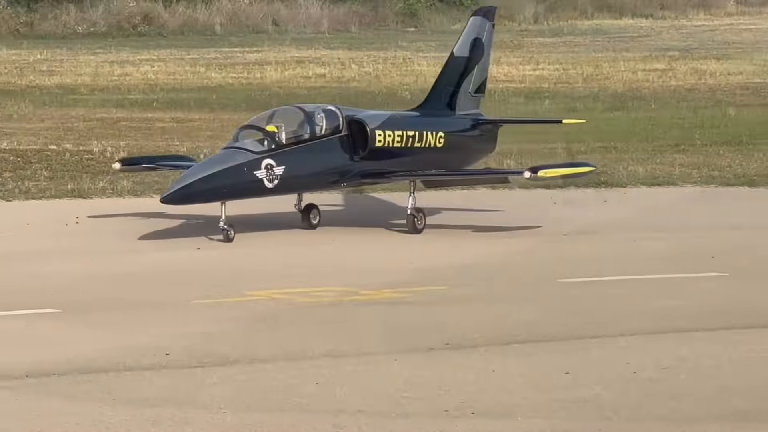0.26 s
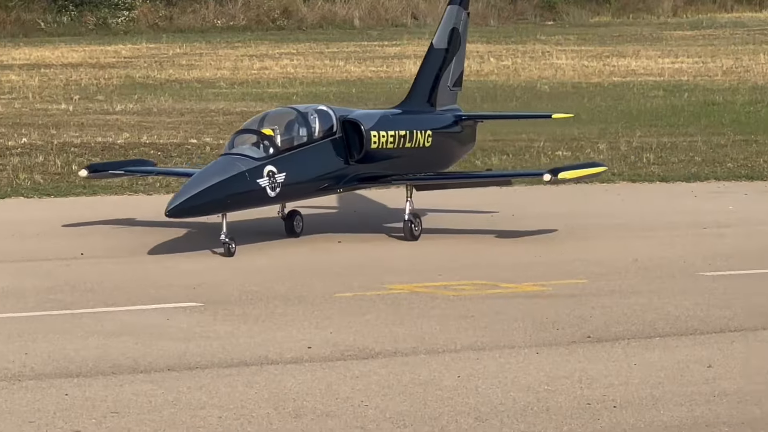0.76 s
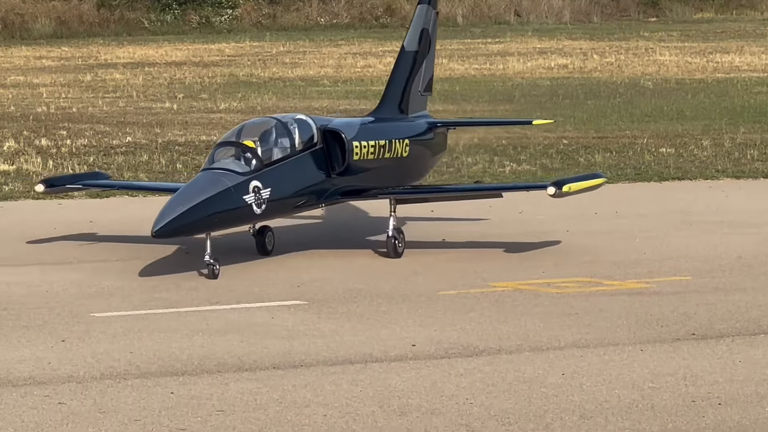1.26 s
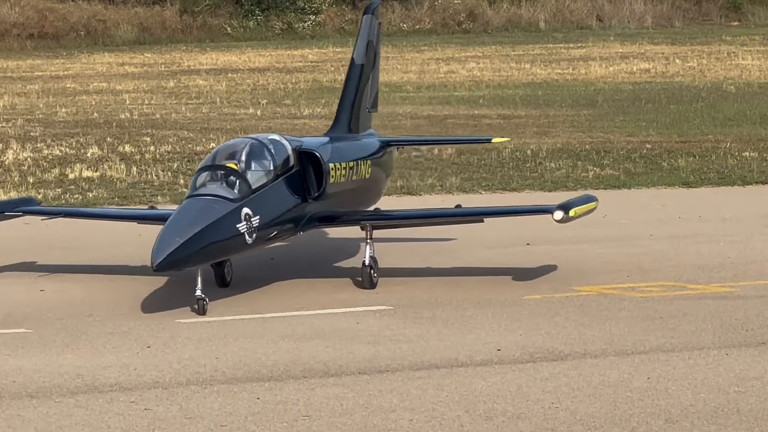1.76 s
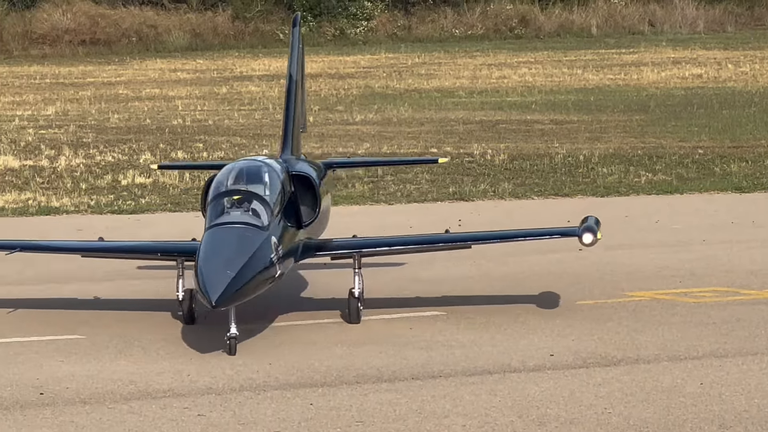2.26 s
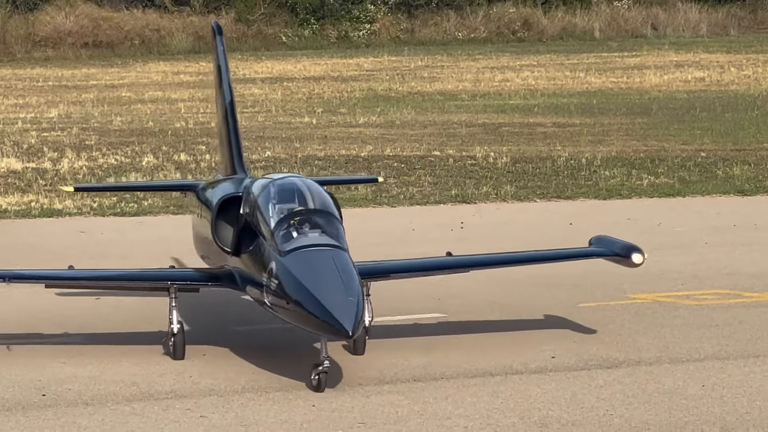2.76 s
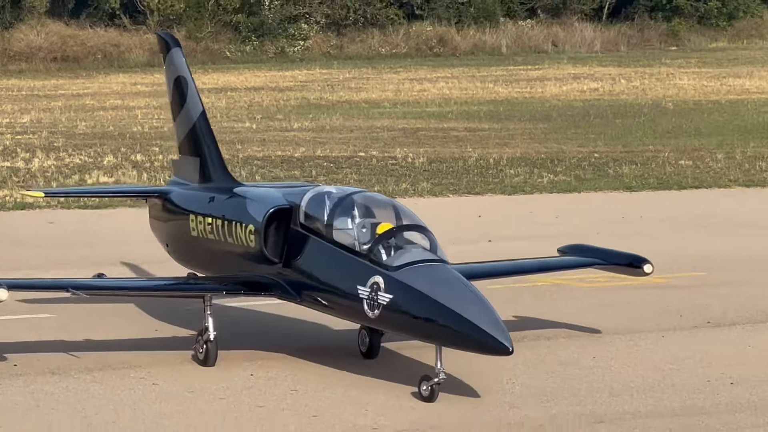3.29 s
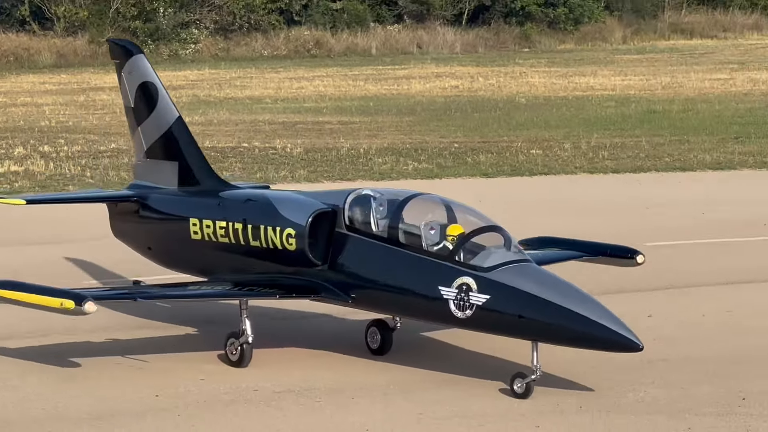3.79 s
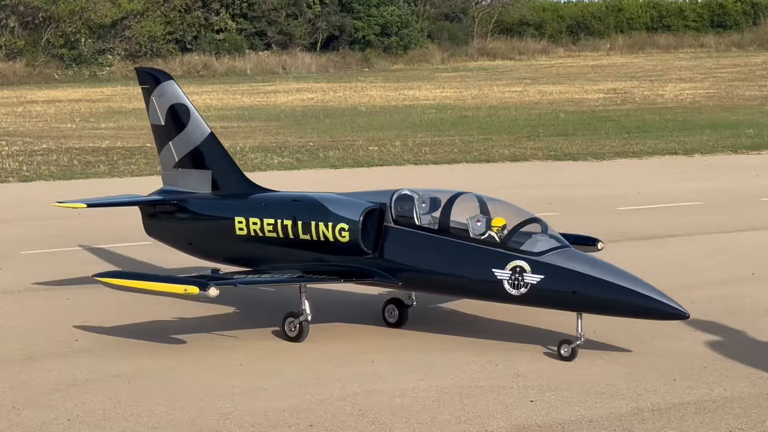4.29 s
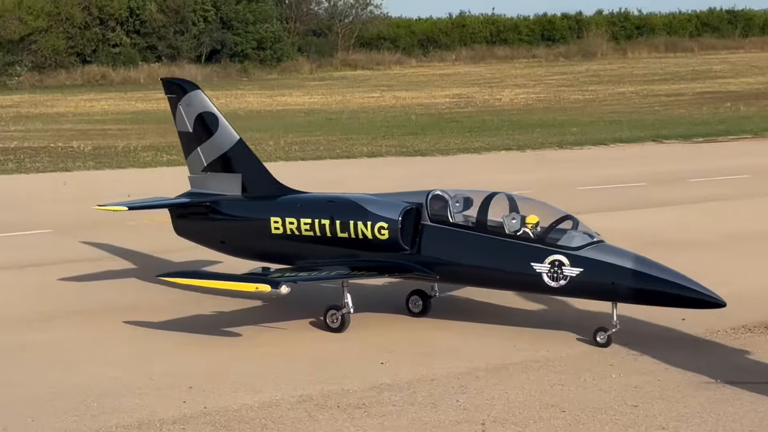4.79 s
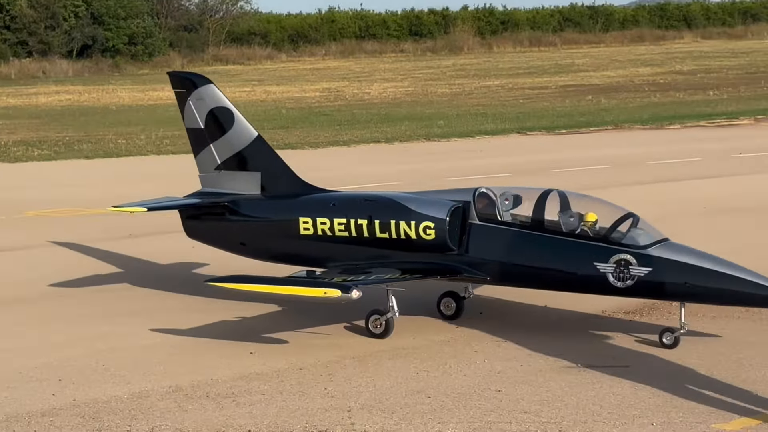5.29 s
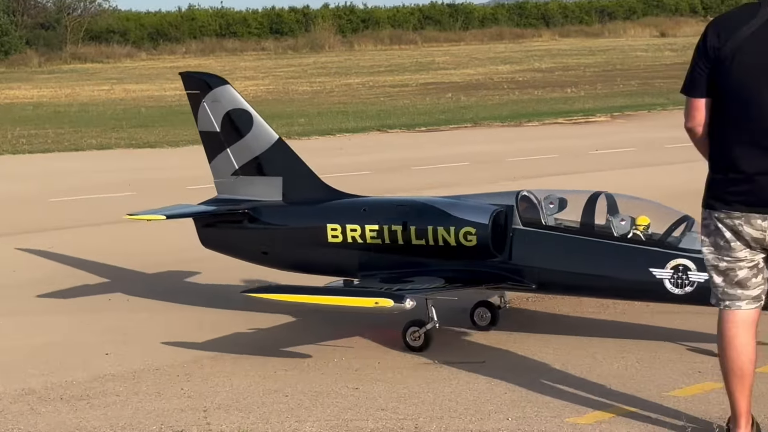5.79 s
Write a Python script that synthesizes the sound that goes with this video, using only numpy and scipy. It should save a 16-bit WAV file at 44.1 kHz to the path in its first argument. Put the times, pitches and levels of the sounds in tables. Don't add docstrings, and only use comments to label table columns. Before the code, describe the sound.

A miniature jet engine slows continuously, its glassy whine falling a few semitones over six seconds. Air hiss opens brightly as the intakes face the close handheld stereo phone, then thins as the aircraft turns broadside, leaving more rough exhaust rush and a thinner whine. Low wind rumble and soft buffets hit the microphone early on. Open, dry runway.

```python
import sys
import numpy as np
from scipy import signal
from scipy.fft import rfft, irfft, next_fast_len
from scipy.io import wavfile
from scipy.ndimage import uniform_filter1d

SR = 44100
rng = np.random.default_rng(int(sys.argv[2]) if len(sys.argv) > 2 else 0)


def gain_from_db(level_db):
    decades = np.asarray(level_db, float) / 20
    return 10 ** decades


def put_to_file(sound):
    columns = np.atleast_2d(sound).T
    safe = np.clip(columns, -1, 1)
    whole_steps = np.round(safe * 32767)
    wavfile.write(sys.argv[1], SR, whole_steps.astype(np.int16))


N = 266805
SIZE = next_fast_len(N, real=True)
TIME = np.arange(N) / SR
FREQ = np.fft.rfftfreq(SIZE, 1 / SR)

# time in seconds, level in dB.
GUST_LEVEL = [(0.0, -38.5), (0.71, -32.5), (1.2, -36), (1.38, -34.5), (1.68, -40), (1.85, -34.5),
              (2.66, -41.5), (2.7, -46.5), (3.42, -46), (3.85, -41), (3.94, -49), (4.55, -47.5),
              (4.97, -44), (5.29, -47.5), (5.4, -44), (5.69, -39), (5.91, -48), (6.05, -35.5)]
# frequency in Hz, density in dB per Hz.
GUST_COLOUR = [(15, -38), (30, -18.5), (55, 2.5), (90, 0), (150, -3), (250, -14), (400, -14.5), (700, -47)]
# time in seconds, peak in dB, centre frequency in Hz.
THUMPS = [(0.078, -22.5, 503), (0.187, -28, 745), (0.299, -28, 620), (0.323, -26, 594), (0.475, -26.5, 586),
          (0.683, -25.5, 417), (0.694, -19.5, 637), (0.78, -28, 376), (0.838, -29.5, 607),
          (0.911, -22.5, 450), (0.959, -27, 363), (1.234, -26, 483), (1.264, -24.5, 545), (1.284, -24, 487),
          (1.381, -21, 329), (1.489, -29, 600), (1.535, -27, 370), (1.585, -24.5, 520), (1.618, -24, 475),
          (1.674, -28, 467), (1.794, -29.5, 675), (2.031, -28.5, 450), (2.11, -29.5, 530),
          (2.217, -27, 435), (2.273, -25, 617), (2.628, -31.5, 513), (2.94, -34, 637), (3.27, -31.5, 392),
          (3.394, -32.5, 610), (3.518, -34, 543)]
SMALL_EDDIES, MIDDLING_EDDIES, GUSTY_S = 170, 60, 3.9

# time in seconds, wing lag in ms, wing share, runway lag in ms, runway share.
ECHOES = [(0, 1.3, -0.0083, 3.26, 0.35), (1, 2.3, 0.063, 3.38, 0.12), (1.8, 2.05, -0.25, 3.76, 0.51),
          (2.7, 2.4, -0.17, 4.5, 0.27), (3.4, 2.3, -0.04, 4.1, 0.12), (5, 1.33, -0.034, 3.93, 0.15),
          (6.05, 0.95, 0.039, 3.85, 0.5)]
# frequency in Hz, density in dB per Hz.
HUM_COLOUR = [(130, -20.5), (190, -9.5), (245, -5), (300, -12), (400, -13.5)]
# frequency in Hz, density in dB per Hz.
RUSH_LOW_COLOUR = [(250, -19), (400, 0), (600, -0.5), (750, 2.5), (950, -4), (1200, -41)]
RUSH_HIGH_COLOUR = [(900, 3.5), (1150, -3.5), (1420, 0), (1700, -3), (2000, -2), (2300, -1.5), (2600, -1)]
# time in seconds, level in dB.
JET_SURGE = [(0, -4), (0.4, 0.5), (1.0, 0), (1.3, 1), (1.6, 0), (1.9, -2.5), (2.3, -0.5), (2.7, -0.5),
             (3.15, 1), (3.45, -1), (3.9, -1), (4.6, 0.5), (5.3, 0), (5.65, 3), (6.05, 2)]

# frequency in Hz, density in dB per Hz.
DUCT_LOW_COLOUR = [(2000, -28), (2600, -4.5), (3150, 1), (3600, -19), (4200, -23)]
DUCT_HIGH_COLOUR = [(2700, -21.5), (3400, 5), (4200, 7), (4700, 4.5), (5200, -10), (6200, -53)]
# frequency in Hz, density in dB per Hz.
HISS_MID_COLOUR = [(4300, -22), (5000, 1.5), (6200, -1), (7000, 4), (7600, 4.5), (8600, 7), (9600, -1.5),
                   (10800, 11.5), (12000, -38)]
HISS_TOP_COLOUR = [(8800, -30), (10000, -3), (11000, 1.5), (12000, -1), (14000, -2.5), (15500, -6),
                   (17000, -10)]
OPENING_DB, OPENING_S = -6.5, 0.3

# time in seconds, blade passing rate in Hz.
BLADE_RATE = [(0, 4504), (0.45, 4435), (1.25, 4307), (1.85, 4212), (2.55, 4109), (3.05, 4034), (3.65, 3951),
              (3.95, 3895), (4.25, 3842), (4.65, 3779), (5.1, 3714), (5.35, 3686), (6.05, 3614)]
# time in seconds, level in dB.
WHISTLE = [(0.0, -36.5), (0.36, -28), (0.66, -18.5), (1.63, -12.5), (1.93, -20), (2.14, -10.5), (2.6, -9.5),
           (2.9, -10.5), (3.39, -12), (3.55, -20), (3.7, -27), (3.84, -26), (3.98, -33), (4.2, -29.5),
           (4.8, -26.5), (5.1, -29), (5.25, -25.5), (5.6, -31), (6.05, -34.5)]
# time in seconds, level in dB.
SHAFT_LINE = [(0, -66.5), (1.8, -70), (2.5, -58), (4.8, -49.5), (5.1, -77), (6.05, -72)]
BLADES = 7
# time in seconds, half width in seconds, depth in dB.
FIRST_FADES = [
    (1.272, .15, -6),
    (2.02, .09, -13),
    (2.41, .11, -22),
    (2.943, .12, -7),
    (3.49, .2, -26),
    (4.95, .2, -18),
    (5.74, .05, -10),
    (5.85, .1, -12),
]
SECOND_FADES = [(1.013, 0.21, -3.5), (1.831, 0.044, -9.5), (2.02, 0.063, -14), (2.255, 0.056, -6),
                (2.504, 0.051, -18), (2.739, 0.071, -23), (2.89, 0.028, -3.5), (2.95, 0.049, -7),
                (3.133, 0.059, -19.5), (3.307, 0.062, -2.5), (3.46, 0.038, -3), (3.502, 0.015, -8),
                (3.62, 0.038, -16.5), (3.652, 0.018, -17), (3.776, 0.049, -9), (3.906, .035, -15),
                (4.046, .03, -4), (4.29, .05, -7), (4.425, .05, -8), (4.649, .025, -5), (4.929, .05, -6),
                (5.338, .04, -8), (5.5, .06, -2.5), (5.68, .04, -6), (5.797, .05, -8), (5.91, .04, -6) ]
THIRD_FADES = [(.768, 0.081, -33.5), (1.731, 0.1, -19.5), (2.265, 0.075, -9), (2.4, 0.036, -3.5),
               (2.534, 0.07, -29), (2.639, .04, -28), (2.8, 0.061, -21), (2.943, 0.062, -30.5),
               (3.243, 0.052, 0), (3.507, 0.049, -10.5), (5.088, 0.091, -18), (5.996, .03, -8)]
FOURTH_FADES = [
    (4.016, 0.058, -13),
    (4.176, 0.019, -25),
    (4.265, .05, -33),
    (4.33, 0.03, -12.5),
    (4.47, 0.15, -9.5),
    (4.769, 0.1, -38),
    (4.979, .08, -9.5),
    (5.627, 0.11, -15),
    (5.742, 0.046, -36),
    (5.842, 0.12, -8),
]
SETS_IN_HZ, SETS_IN_WIDTH_HZ = 15765, 25
FAR_ECHO_S = 0.195

# time in seconds, angle off the line to the phone in degrees.
HEADING = [
    (0, -53),
    (1, -53.5),
    (1.75, -28.5),
    (2.25, -4.5),
    (2.5, 1),
    (3, 17),
    (3.5, 47.5),
    (4, 53.5),
    (5, 79),
    (6.05, 84),
]
# level aside in dB, lobe in dB, aim in degrees, lobe width in degrees,
# rise from nose to tail in dB per 100 degrees.
BEAMS = dict(first=(-44.5, 7, -8.5, 21, 0), third=(-43.5, 14.5, -14.5, 39, 1.5),
         fourth=(-34, 2.5, 67, 5.5, 0.7), duct_low=(-55, 8.5, 23.5, 20.5, 0),
         duct_high=(-51.5, 12, -8.5, 33, -3), hiss_mid=(-50, 4.5, -15, 64, -1),
         hiss_top=(-47.5, 10, -6, 53, 0), hum=(-39.5, -7, -8.5, 39, -1.2),
         rush_low=(-45, -8.5, 33, 23.5, 1.4), rush_high=(-45.5, -1.5, 27.5, 27, -6),
         wing_shade=(0.09, -2.5, 44, 7, 1), far_echo=(-48.5, 9.5, 77.5, 8, 4))

# frequency in Hz, lead of the left port in rad.
PORTS = [(250, .4), (800, .25), (1350, 0), (1700, -1.7), (2150, -.1), (2650, .1), (3200, .8), (3950, .75),
         (4500, 0), (6200, .05), (6900, .9), (7480, 3.14), (8000, 5.4), (8420, 5.87), (9050, 5.45),
         (10400, 3.6), (11200, 3.1), (14300, .05), (15700, -1.1)]
# frequency in Hz, level in dB.
QUIET = [(10000, -100), (12300, -80), (14500, -80.5), (16000, -76)]
TOP_HZ, BAND_BINS = 15870, 12


def curves(table):
    s, *columns = np.transpose(table)
    return [np.interp(TIME, s, c) for c in columns]


def swells(table):
    s, *columns = np.transpose(table)
    return [np.interp(TIME, s, gain_from_db(c)) for c in columns]


def along_hz(points, column):
    points = np.array(points)
    return np.interp(np.log(FREQ + 1), np.log(points[:, 0]), points[:, column])


def unit(x):
    return x / np.sqrt(np.mean(x ** 2))


def walk(rate_hz):
    hold = int(SR / rate_hz)
    steps = np.repeat(rng.standard_normal(N // hold + 1), hold)
    return unit(uniform_filter1d(uniform_filter1d(steps, hold), hold)[:N])


def turbulence(colour, flicker_db, rate_hz, lo_hz, hi_hz):
    first_hz, last_hz = colour[0][0], colour[-1][0]
    spectrum = rfft(rng.standard_normal(SIZE)) * gain_from_db(along_hz(colour, column=1))
    spectrum *= (FREQ > first_hz) & (FREQ < last_hz)
    inside = spectrum[(FREQ > lo_hz) & (FREQ < hi_hz)]
    spectrum /= np.sqrt(2 * np.sum(np.abs(inside) ** 2)) / SIZE
    half_octave = 2 * np.log2(FREQ + 1)
    total = 0
    for k in range(int(2 * np.log2(first_hz)) + 1, int(2 * np.log2(last_hz)) + 1):
        band = irfft(spectrum * np.clip(1 - np.abs(half_octave - k), 0, 1), SIZE)[:N]
        total = total + band * gain_from_db(flicker_db * walk(rate_hz))
    return total


def beam(part):
    aside_db, lobe_db, aim, width, rise_db = BEAMS[part]
    heading = curves(HEADING)[0]
    return aside_db + lobe_db * np.exp(-((heading - aim) / width) ** 2) + rise_db * heading / 100


def cancelling(fades):
    gain = 1
    for s, width_s, depth_db in fades:
        left = min(gain_from_db(depth_db), 1)
        gain = gain * (np.sqrt(1 - left ** 2) * np.tanh((TIME - s) / width_s) + 1j * left)
    return gain


def eddies():
    when, size, pitch = rng.random((SMALL_EDDIES, 3)).T
    when = 0.01 + when ** 1.4 * 5.9
    gust_db = np.interp(when, *np.transpose(GUST_LEVEL))
    small = np.transpose([when, gust_db - 1.5 + 8 * (size - 0.5), 220 + 380 * pitch])
    when, size, pitch = rng.random((MIDDLING_EDDIES, 3)).T
    when = 0.05 + when ** 1.2 * GUSTY_S
    middling = np.transpose([when, -28.5 - 2.8 * when - 7 * size, 380 + 280 * pitch])
    return np.vstack([THUMPS, small, middling])


def wind():
    gust = gain_from_db(curves(GUST_LEVEL)[0] - 0.1)
    common = gust * gain_from_db(1.17 * walk(22.06)) * turbulence(GUST_COLOUR, 0.8, 25.0, lo_hz=30, hi_hz=146)
    apart = gain_from_db(-27.0) * gust * turbulence(GUST_COLOUR, 1.5, 14.0, lo_hz=30, hi_hz=150)
    flips = eddies()
    for (s, db, hz), (phase, lean) in zip(flips, rng.random((len(flips), 2))):
        near = slice(int((s - 0.006) * SR), int((s + 0.025) * SR))
        age = (TIME[near] - s) * hz
        cycles = 1.7 * (1 - np.exp(-age / 1.83))
        shape = np.where(age < 0, np.exp(-(age / 1.16) ** 2), np.exp(-(age / 2.1) ** 2))
        flip = gain_from_db(db - 0.5) * shape * np.cos(2 * np.pi * (cycles + 0.45 * (phase - 0.5)))
        flip -= gain_from_db(db - 1.0) * np.exp(-((age - 2.2) / 1.3) ** 2) * np.sin(2 * np.pi * age / 3.23)
        common[near] += flip
        apart[near] += 0.5 * 0.55 * (lean - 0.5) * flip
    return np.array([common + apart, common - apart])


def echoes(x):
    wing_ms, wing, runway_ms, runway = curves(ECHOES)
    dull = signal.sosfilt(signal.butter(2, 4200.0, fs=SR, output="sos"), x)
    off_wing = wing * np.interp(TIME - wing_ms / 1000, TIME, dull)
    off_runway = runway * np.interp(TIME - runway_ms / 1000, TIME, dull)
    return x + off_wing + off_runway


def exhaust():
    surge_db = curves(JET_SURGE)[0]
    hum_db, low_db, high_db = (beam(p) + surge_db for p in ("hum", "rush_low", "rush_high"))
    rush = gain_from_db(low_db - 1.5) * turbulence(RUSH_LOW_COLOUR, 0.49, 12.0, lo_hz=400, hi_hz=1010)
    rush += gain_from_db(high_db - 0.5) * turbulence(RUSH_HIGH_COLOUR, 0.33, 9.4, lo_hz=1080, hi_hz=2580)
    hum = gain_from_db(hum_db - 4.0) * turbulence(HUM_COLOUR, 1.6, 22.0, lo_hz=187, hi_hz=300)
    return rush + hum


def intake():
    low_db, high_db, mid_db, top_db = (beam(p) for p in ("duct_low", "duct_high", "hiss_mid", "hiss_top"))
    duct = gain_from_db(low_db + 1.06) * turbulence(DUCT_LOW_COLOUR, 0.99, 10.0, lo_hz=2660, hi_hz=3700)
    duct += gain_from_db(high_db + 0.67) * turbulence(DUCT_HIGH_COLOUR, 1.0, 13.0, lo_hz=3250, hi_hz=5100)
    hiss = gain_from_db(mid_db + 0.87) * turbulence(HISS_MID_COLOUR, 0.99, 22.0, lo_hz=5200, hi_hz=7160)
    top = gain_from_db(top_db + 0.8) * turbulence(HISS_TOP_COLOUR, 0.54, 8.1, lo_hz=9870, hi_hz=15700)
    return gain_from_db(beam("wing_shade")) * (duct + hiss) + top


def compressor():
    blade_hz = curves(BLADE_RATE)[0]
    turn = 2 * np.pi * np.cumsum(blade_hz) / SR
    set_in = 0.5 + 0.5 * np.tanh((SETS_IN_HZ - 4 * blade_hz) / SETS_IN_WIDTH_HZ)
    gains = [gain_from_db(beam("first")) * cancelling(FIRST_FADES),
             swells(WHISTLE)[0] * cancelling(SECOND_FADES),
             gain_from_db(beam("third")) * cancelling(THIRD_FADES),
             gain_from_db(beam("fourth")) * cancelling(FOURTH_FADES) * set_in]
    scatters_db = [-62.5, -50.5, -48.5, -42.5]
    tones = 0
    for k, (gain, scatter_db) in enumerate(zip(gains, scatters_db), start=1):
        scatter = np.minimum(gain_from_db(scatter_db), 0.23 * np.abs(gain))
        scattered = scatter * (walk(90.0) + 1j * walk(90.0))
        direct = gain * gain_from_db(0.9 * walk(40.0))
        tones = tones + np.imag((direct + scattered) * np.exp(1j * k * turn))
    shaft = swells(SHAFT_LINE)[0] * np.sin(turn * (2 * BLADES + 1) / BLADES)
    late_turn = np.interp(TIME - FAR_ECHO_S, TIME, turn, left=0)
    far_echo = gain_from_db(beam("far_echo") + 2.8 * walk(9.0)) * np.sin(2 * late_turn)
    return np.sqrt(2) * (tones + shaft + far_echo)


def scene():
    opening = gain_from_db(OPENING_DB * np.exp(-TIME / OPENING_S))
    return compressor() + echoes(opening * intake() + exhaust()) + wind()


def ports(dry):
    left_db = 1.2 * np.exp(-((FREQ - 1750) / 450) ** 2)
    half = gain_from_db(left_db) * np.exp(0.5j * along_hz(PORTS, column=1))
    return irfft(rfft(dry, SIZE) * np.array([half, 1 / half]) * (FREQ < TOP_HZ), SIZE)[:, :N]


def masking(x, under_db, up_db_per_khz, down_db_per_khz, twin_db):
    sum_and_difference = np.array([x[0] + x[1], x[0] - x[1]]) / 2
    hz, _, z = signal.stft(sum_and_difference, SR, window="cosine", nperseg=2048)
    bins_db = 20 * np.log10(np.abs(z) + 1e-9)
    starts = np.arange(0, len(hz), BAND_BINS)
    band = np.arange(len(hz)) // BAND_BINS
    band_hz = hz[starts]
    usual_db = np.add.reduceat(bins_db, starts, axis=1) / BAND_BINS
    loudest_db = np.maximum.reduceat(bins_db, starts, axis=1).max(axis=0)
    gap_khz = (band_hz[:, None] - band_hz[None, :]) / 1000
    spread_db = np.where(gap_khz > 0, up_db_per_khz * gap_khz, -down_db_per_khz * gap_khz)
    hidden_db = (loudest_db[None] - spread_db[:, :, None]).max(axis=1) - under_db
    hidden_db = np.maximum(hidden_db, np.interp(band_hz, *np.transpose(QUIET))[:, None])
    twin_limit_db = usual_db.max(axis=0) - twin_db
    limit_db = np.where(band_hz[:, None] > 1200, np.maximum(hidden_db, twin_limit_db), -300)
    limit_db = limit_db + 1.2 * rng.standard_normal(limit_db.shape)
    spells = uniform_filter1d(rng.standard_normal(limit_db.shape), size=4, axis=1)
    limit_db = limit_db + 9 * uniform_filter1d(spells, size=5, axis=0)
    keep = (usual_db > limit_db)[:, band] | (bins_db > limit_db[band] + 10.5)
    mid, side = signal.istft(z * keep, SR, window="cosine", nperseg=2048)[1][:, :N]
    return np.array([mid + side, mid - side])


def band_limit(x):
    return signal.sosfilt(signal.butter(12, 17010, fs=SR, output="sos"), x)


def record(dry):
    mix = masking(ports(dry), under_db=43.0, up_db_per_khz=5.2, down_db_per_khz=24.0, twin_db=11.0)
    return band_limit(mix)


dry = scene()
out = record(dry)
put_to_file(out)
```